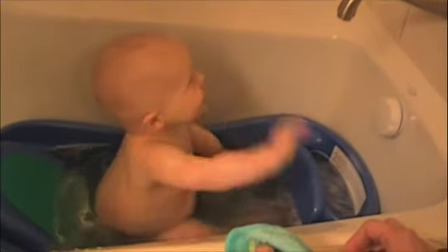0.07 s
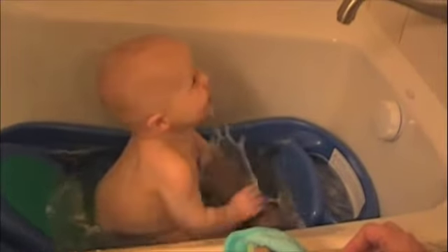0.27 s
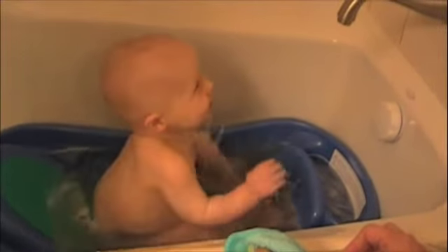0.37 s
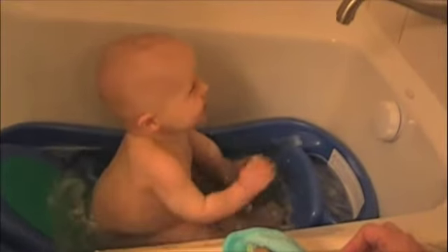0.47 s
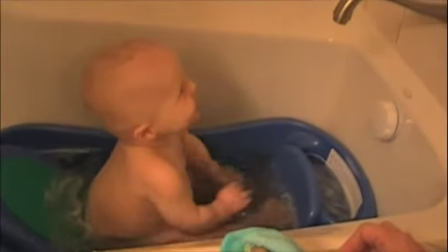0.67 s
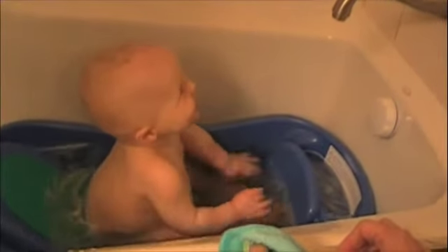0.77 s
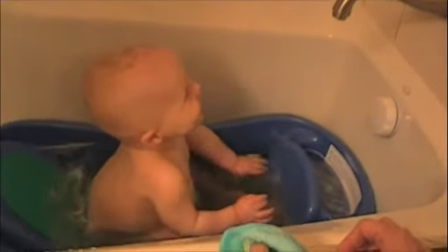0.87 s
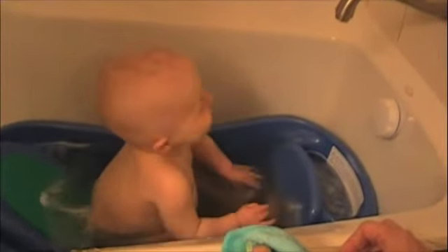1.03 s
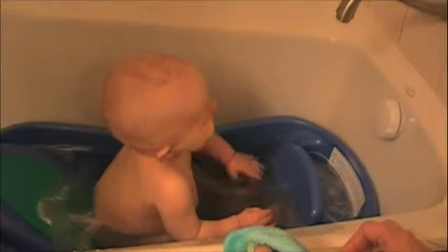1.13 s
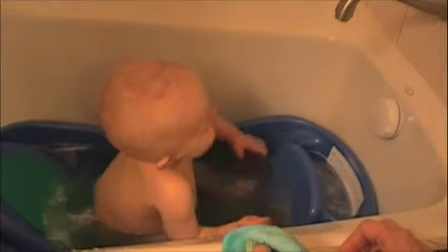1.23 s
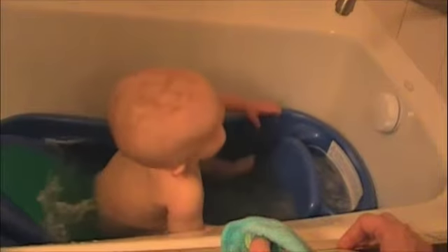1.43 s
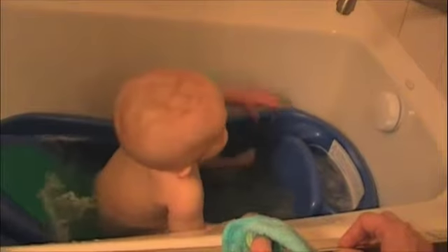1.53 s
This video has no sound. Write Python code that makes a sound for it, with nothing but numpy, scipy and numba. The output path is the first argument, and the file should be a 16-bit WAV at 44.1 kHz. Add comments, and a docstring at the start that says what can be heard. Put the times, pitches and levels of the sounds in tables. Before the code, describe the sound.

Two quick splashes in a bathtub, then trickling drips and faint sloshing in a small echoing room

```python
"""Hands slap bath water twice in a small tiled bathroom; spray crackles, bubbles and drips ring, water sloshes.
Bubbles and drips are damped sines, droplet ticks are short noise bursts, and the churned water mixes spiky
noise with swarms of small rings. The tub walls and tiles answer with echoes and a decaying noise tail.
A camcorder microphone with a treble peak hears the water over room rumble and a faint hum."""
import sys
import numpy as np
from scipy import signal
from scipy.fft import rfft, irfft, next_fast_len
from scipy.io import wavfile
from numba import njit

SR = 44100
rng = np.random.default_rng(int(sys.argv[2]) if len(sys.argv) > 2 else 0)


def volts(x):
    """Linear amplitude factor 10**(x/20) for a level x in dB, scalar or array-like."""
    e = np.asarray(x, float) / 20
    return 10 ** e


def inscribe(sig):
    """Save sig as 16-bit PCM at rate SR to the path in sys.argv[1].

    A 1-D sig is mono; a 2-D sig holds one channel per row.
    Samples are clipped to [-1, 1] before scaling.
    """
    pcm = np.round(np.clip(np.atleast_2d(sig).T, -1, 1) * 32767)
    wavfile.write(sys.argv[1], SR, pcm.astype(np.int16))


N = 70560  # samples, 1.6 s

# Steady hum. Each row: pitch in Hz, peak level in dB before the stereo balance.
HUM = [(119, -65)]
# Spectrum of the room rumble and air. Each row: frequency in Hz, relative level in dB per Hz.
AIR_SPECTRUM = [(20, -16), (40, -28), (60, 11.5), (80, 7), (100, 4), (140, 4.5), (250, 0), (600, -2.5),
                (1500, -13), (3000, -28), (5000, -22), (7000, -42), (10000, -52), (13000, -32),
                (16000, -48)]
# How long the tiled room rings. Each row: frequency in Hz, time to fall 60 dB in seconds.
ROOM_T60 = [(200, 0.33), (800, 0.4), (2000, 0.45), (4000, 0.49), (8000, 0.41), (14000, 0.35)]
# Tone of the room tail. Each row: frequency in Hz, gain in dB.
ROOM_COLOUR = [(200, -1), (1000, 2.5), (2000, 1.5), (3200, -3), (5000, 1.5), (8000, -3.5), (14000, -5)]
# Echoes off the tub walls. Each row: delay in seconds, gain in dB before the echo tone.
WALL_ECHOES = [(0.0108, -12.5), (0.0236, -17), (0.036, -14)]
# Tone of the wall echoes. Each row: frequency in Hz, gain in dB.
ECHO_COLOUR = [(300, 4), (1500, 1), (3000, 3), (7000, -5.5), (14000, 5)]
# Churned water over time. Each row: time in seconds, then the rms levels in dB, ahead of the microphone,
# of spray fizz, small-bubble froth and slosh.
CHURN = [(0, -72, -57, -45), (.1, -59, -52.5, -52.5), (.212, -62, -53.5, -43.5), (0.223, -30.5, -36, -44),
         (.27, -34, -34.5, -60), (.33, -45.5, -39.5, -47.5), (.42, -40.5, -43, -60),
         (0.496, -40.5, -66, -65), (0.51, -30, -28.5, -38.5), (0.581, -31.5, -38, -50),
         (.63, -34.5, -43.5, -62), (.75, -40, -47.5, -54), (.9, -50.5, -57.5, -60),
         (1.149, -59, -105, -65.5), (1.197, -60.5, -54.5, -60), (1.235, -59, -49, -51.5),
         (1.271, -60.5, -55, -57.5), (1.33, -62.5, -62, -60), (1.472, -51, -58.5, -58),
         (1.6, -51, -48.5, -59)]
# Spectrum of the spray fizz. Each row: frequency in Hz, relative level in dB per Hz.
FIZZ_SPECTRUM = [(880, -15), (1500, -10), (2610, -1), (3410, -4), (4240, -5.5), (5170, -7), (7170, -4),
                 (14600, -34), (16000, -46)]
# Loudness of the small bubbles by pitch. Each row: pitch in Hz, relative level in dB.
FROTH_LEVEL = [(300, -21.5), (600, -5), (1000, -4), (1400, -3), (2000, -1), (3000, -7.5), (4500, -52)]
# Droplet ticks. Each row: start in seconds, peak level in dB ahead of the microphone, centre in Hz,
# burst time in seconds.
TICKS = [(0.0551, -38.5, 8560, 0.00058), (0.09, -32.5, 6800, 0.0022), (0.176, -46, 7440, 0.0013),
         (0.19, -35, 8550, 0.00034), (0.2155, -24, 8700, 0.0026), (0.2257, -16, 7220, 0.0019),
         (0.2272, -15, 9450, 0.0015), (0.432, -25.5, 7660, 0.002), (0.5037, -18.5, 7020, 0.0018),
         (0.5702, -13.5, 7520, 0.0034), (0.5774, -6.5, 7120, 0.0012), (0.7244, -20.5, 6900, 0.0018),
         (0.8877, -36, 7600, 0.0015), (0.9049, -38, 6704, 0.0052), (0.9612, -36.5, 7960, 0.0018),
         (1.0216, -34, 7740, 0.0004), (1.279, -40, 7765, 0.0014), (1.308, -37.5, 7550, 0.00055),
         (1.33, -46, 7000, 0.00066), (1.364, -44, 7600, 0.00096), (1.3743, -37, 7750, 0.00059),
         (1.408, -42, 6100, 0.00077), (1.414, -39.5, 8650, 0.0031), (1.4389, -40, 7500, 0.0025),
         (1.4752, -29, 7700, 0.00071), (1.4942, -25.5, 7250, 0.0021), (1.528, -30, 6700, 0.00092),
         (1.5485, -32.5, 6940, 0.00062)]
# Bubbles and drips. Each row: start in seconds, approximate peak level in dB ahead of the microphone,
# starting pitch in Hz, time to fall 60 dB in seconds, upward glide as a third of the full rise (a share).
BUBBLES = [(.025, -45, 254, 0.37, 0.074), (0.101, -42, 270, 0.23, 0.03), (.54, -30.5, 342, 0.044, 0.11),
           (0.546, -34.5, 169, 0.088, 0), (0.334, -26.5, 1850, 0.05, .0), (1.54, -35, 1520, 0.099, 0.0076),
           (0.227, -10.5, 1853, 0.016, 0.024), (0.2467, -13, 3540, 0.017, 0.02),
           (.2475, -22.5, 3900, 0.0075, 0.039), (0.248, -23, 2950, 0.02, .02),
           (0.252, -38, 1870, 0.09, .01), (0.279, -31.5, 1778, 0.067, 0.016), (0.277, -18, 1410, .02, 0.12),
           (.288, -30, 678, 0.095, 0.025), (0.3, -25, 1830, 0.047, 0), (0.3154, -29.5, 3050, 0.044, 0.041),
           (.33, -30, 622, 0.054, 0), (0.349, -23.5, 2840, 0.017, 0.059),
           (0.4575, -29, 3015, 0.025, 0.0062), (.468, -33, 752.4, 0.23, 0.047),
           (.4933, -22.5, 2100, 0.015, 0.062), (.503, -26, 3600, 0.02, 0.021),
           (0.5108, -16.5, 1667, 0.028, 0.0), (0.511, -16, 1318, 0.024, 0.093),
           (.508, -25.5, 802, 0.053, 0.064), (.552, -26.5, 897, .03, 0.073),
           (.52, -30, 403.7, 0.083, 0.025), (.524, -19.5, 600, 0.027, 0.076), (0.197, -29.5, 201, 0.11, .0),
           (0.239, -24.5, 191.2, 0.11, .0), (.542, -19.5, 1327, 0.022, 0.062),
           (.551, -17.5, 1420, 0.014, 0.082), (0.5774, -11.5, 2210, 0.0076, 0.035),
           (0.579, -14.5, 4090, 0.01, 0.11), (0.663, -22.5, 1440, 0.01, 0.029),
           (0.691, -21.5, 1916, 0.027, 0.024), (0.6956, -18, 1818, 0.053, 0.066),
           (0.7121, -16.5, 1230, 0.064, 0), (0.7237, -18, 1217, 0.019, 0.088),
           (0.7353, -18, 1851, 0.0094, 0.038), (0.741, -16.5, 3172, 0.0038, 0.073),
           (0.7716, -8, 1750, 0.0056, 0.05), (0.75, -29, 1147, 0.058, 0.024),
           (0.766, -31.5, 1203, 0.056, 0.063), (.793, -29, 1168, 0.066, 0.047),
           (.8235, -28, 1950, 0.017, 0.12), (.8235, -28, 3680, 0.011, 0.0042),
           (0.906, -28, 2830, 0.012, 0.072), (0.9342, -33, 4130, 0.011, 0.043),
           (1.041, -33.5, 2930, 0.019, 0), (1.0415, -39, 1990, 0.032, 0.021),
           (1.0405, -31.5, 2550, 0.0062, 0.17), (1.05, -40, 2980, 0.03, 0.039),
           (1.066, -45.5, 2950, 0.18, 0.002), (1.13, -55, 4200, 0.11, 0.053),
           (1.2006, -51, 4560, 0.027, 0.018), (1.228, -38, 325, 0.014, .03),
           (1.2397, -36, 430, .014, 0.088), (1.2406, -47, 2060, 0.016, 0.019),
           (1.23, -43, 800, 0.025, 0.08), (1.285, -48.5, 638, 0.16, .0), (1.2952, -29, 7120, 0.0075, 0.014),
           (1.354, -39, 305, 0.026, 0.016), (1.3757, -32.5, 3070, 0.018, 0.01),
           (1.379, -40, 3525, 0.039, 0.036), (1.421, -30, 2970, 0.01, 0),
           (1.4425, -35, 3280, 0.0088, 0.085), (1.4771, -31.5, 1895, 0.022, 0.025),
           (1.486, -39, 1870, 0.14, 0.017), (1.4943, -21.5, 4270, 0.0042, 0.0057),
           (1.5285, -22, 1690, 0.02, 0), (1.529, -30, 2890, 0.0082, 0.031)]
# Microphone response to the water. Each row: frequency in Hz, gain in dB.
MIC = [(60, -14), (130, -11.5), (200, -2), (5500, 1), (7300, 3), (9000, 2), (12500, 7.5), (15000, 5),
       (17000, -25)]
# Tone of the side signal. Each row: frequency in Hz, gain in dB.
SIDE_COLOUR = [(60, -23.5), (250, -15.5), (1000, -14.5), (3500, -10), (5600, -17.5), (6800, -18),
               (7800, -1), (9000, -4), (10500, -1), (12000, -12), (15000, -20)]
# Stereo balance of the mid signal. Each row: frequency in Hz, lean to the left in dB before each channel's share.
LEFT_LEAN = [(40, -7), (150, -3), (500, -3.5), (1500, -0.5), (6000, -0.5), (12000, 0.7)]


def curve(table, hz):
    """Read a table on a log-frequency axis."""
    points = np.array(table, float)
    return np.interp(np.log(np.maximum(hz, 1)), np.log(points[:, 0]), points[:, 1])


def colour(x, table, share=1):
    """Filter by a table of frequency and dB, scaled by share."""
    m = next_fast_len(len(x))
    hz = np.arange(m // 2 + 1) * SR / m
    return irfft(rfft(x, m) * volts(share * curve(table, hz)), m)[:len(x)]


def unit_rms(x):
    """Bring to rms 1."""
    return x / np.sqrt(np.mean(x ** 2))


def unit_energy(x):
    """Bring to energy 1."""
    return x / np.sqrt(np.sum(x ** 2))


def hum():
    """A constant sine with a random starting phase."""
    t = np.arange(N) / SR
    return sum(volts(db) * np.sin(2 * np.pi * (hz * t + rng.random())) for hz, db in HUM)


def room_air():
    """Steady noise, heavy in the lows, at rms 1."""
    return unit_rms(colour(rng.standard_normal(N), AIR_SPECTRUM))


def room_tail():
    """Decaying noise, band by band, building up over the first reflections; energy 1."""
    t = np.arange(int(.9 * SR)) / SR
    hz = np.fft.rfftfreq(len(t), 1 / SR)
    spectrum = rfft(rng.standard_normal(len(t)))
    tail = np.zeros(len(t))
    for centre in 60 * 2. ** np.arange(9):
        octave = np.clip(1 - np.abs(np.log2(np.maximum(hz, 60) / centre)), 0, 1)
        decay = volts(-60 * t / curve(ROOM_T60, centre))
        tail += irfft(spectrum * octave, len(t)) * decay
    return unit_energy(tail * np.clip((t - .003) / 0.018, 0, 1))


def reverb(water):
    """The water convolved with a fresh room tail."""
    lead = int(.2 * SR)
    # the sloshing was already going on: its opening, reversed, goes ahead so the room is ringing
    primed = np.r_[water[lead:0:-1], water]
    return signal.fftconvolve(primed, colour(room_tail(), ROOM_COLOUR))[lead:lead + N]


def smeared(x):
    """A curved wall spreads a reflection over a few milliseconds of decaying noise, energy 1."""
    spread = rng.standard_normal(400) * np.exp(-np.arange(400) / SR / 0.0021)
    return signal.fftconvolve(x, unit_energy(spread))[:N]


def delayed(x, seconds):
    """Start later, cut to the scene length."""
    late = int(seconds * SR)
    return np.r_[np.zeros(late), x[:N - late]]


def tub_echoes(water):
    """A clean first reflection off the tub's near side, then smeared, recoloured wall echoes."""
    echoes = volts(-14) * delayed(water, .003)
    recoloured = colour(water, ECHO_COLOUR)
    for seconds, db in WALL_ECHOES:
        echoes += volts(db) * delayed(smeared(recoloured), seconds)
    return echoes


@njit
def ring(n, t, size, hz, t60, glide, rise):
    """Damped sines that swell in `rise` cycles and slide up as they fade."""
    y = np.zeros(n)
    for e in range(len(t)):
        start, length, cycles = int(t[e] * SR), int(t60[e] * SR), 0.
        for i in range(min(length, n - start)):
            cycles += hz[e] * (1 + 3 * glide[e] * i / length) / SR
            swell = 1 - np.exp(-cycles / rise)
            fade = np.exp(-6.9 * i / length)  # 60 dB down at t60
            y[start + i] += size[e] * np.sin(2 * np.pi * cycles) * fade * swell
    return y


def swarm(hz, db, cycles, scatter_db, glide):
    """Rings of uneven size and length at random moments, at the given pitches and relative levels."""
    when, luck, spread = rng.random((3, len(hz)))
    size = volts(db - scatter_db * np.log(1 - luck))
    t60 = cycles * (.5 + spread) / hz
    return unit_rms(ring(N, when * N / SR, size, hz, t60, glide * spread, 0.53))


def fizz():
    """Spray: noise whose level jumps at random every 8 samples, so it crackles."""
    jumps = volts(1.75 * rng.exponential(size=N // 8 + 1)).repeat(8)[:N]
    return unit_rms(colour(rng.standard_normal(N) * jumps, FIZZ_SPECTRUM))


def froth():
    """A crowd of small bubbles ringing from 300 to 4500 Hz."""
    hz = 300 * 15 ** rng.random(size=1600)
    return swarm(hz, curve(FROTH_LEVEL, hz), cycles=26.0, scatter_db=3.0, glide=0.098)


def slosh():
    """Low water movement: short rings clustered around 242.6 Hz."""
    hz = 242.6 * np.exp(0.271 * rng.standard_normal(size=300))
    return swarm(hz, 0, cycles=10.9, scatter_db=-0.1, glide=0.04)


def churn():
    """Fizz, froth and slosh, each riding its own level curve."""
    points = np.array(CHURN, float)
    t = np.arange(N) / SR
    fizz_gain, froth_gain, slosh_gain = [volts(np.interp(t, points[:, 0], points[:, k])) for k in (1, 2, 3)]
    return fizz_gain * fizz() + froth_gain * froth() + slosh_gain * slosh()


def ticks():
    """Each droplet is a short noise burst, band-passed around its centre."""
    y, t = np.zeros(N), np.arange(800) / SR
    for start, db, hz, seconds in TICKS:
        band = [hz / 1.148, min(hz * 1.16, 20000)]
        sos = signal.butter(N=3, Wn=band, btype="bandpass", fs=SR, output="sos")
        swell_and_fade = (t / seconds) ** 0.65 * np.exp(-1.5 * t / seconds)
        burst = signal.sosfilt(sos, rng.standard_normal(800) * swell_and_fade)
        i = int(start * SR)
        y[i:i + 800] += (volts(db) * burst / np.abs(burst).max())[:N - i]
    return y


def bubbles():
    """Each listed bubble or drip rings once, as a damped sine with its own glide."""
    t, db, hz, t60, glide = np.array(BUBBLES, float).T.copy()
    # a small lift, since the gradual swell lowers each ring's peak
    return ring(N, t, volts(db + 1.5), hz, t60, glide, 0.62)


def scene():
    """Water, its echoes and tail, room air and hum; mid and side spread to two channels."""
    water = colour(churn() + ticks() + bubbles(), MIC)
    mid = water + tub_echoes(water) + volts(-5) * reverb(water)
    mid = mid + volts(-56.5) * room_air() + hum()
    # the side has its own tail, reflection and air, which makes the room wide
    side = reverb(water) + volts(1.0) * smeared(water)
    side = colour(volts(-4.5) * side + volts(-41.5) * room_air(), SIDE_COLOUR)
    left = colour(mid, LEFT_LEAN, 0.85) + side
    right = colour(mid, LEFT_LEAN, -0.3) - side
    return np.array([left, right])


def top_cut(x):
    """Nothing passes above the cut-off."""
    return signal.sosfilt(signal.butter(12, 16510, fs=SR, output="sos"), x)


def record(dry):
    """Hand over the finished mix."""
    return top_cut(dry)


dry = scene()
out = record(dry)
inscribe(out)
```